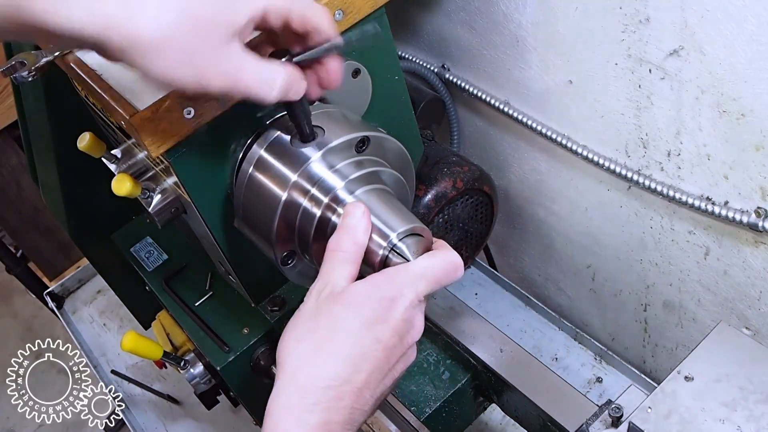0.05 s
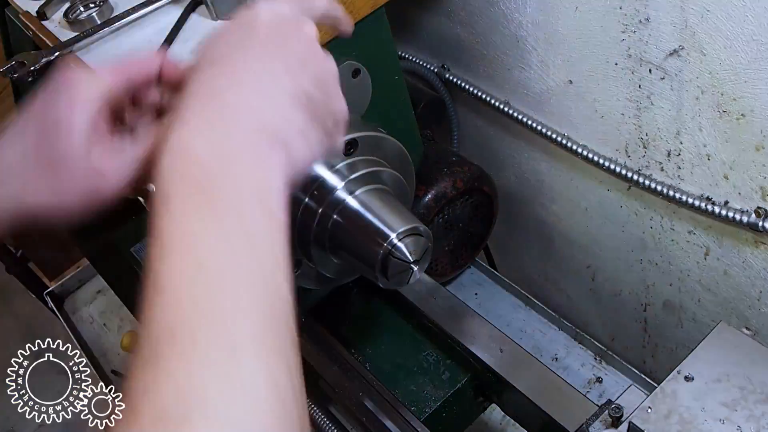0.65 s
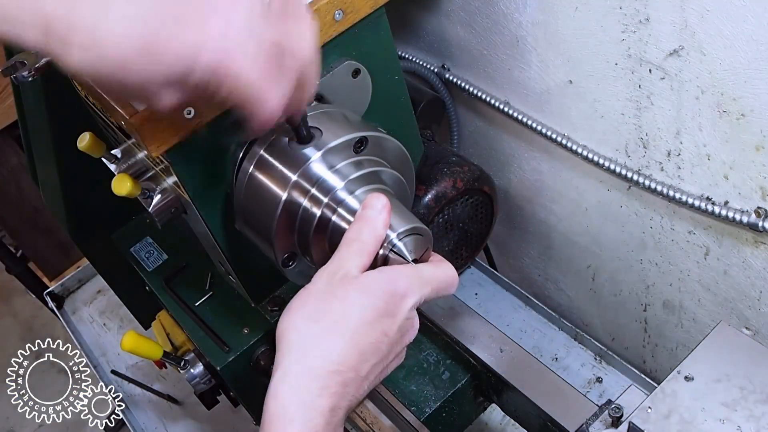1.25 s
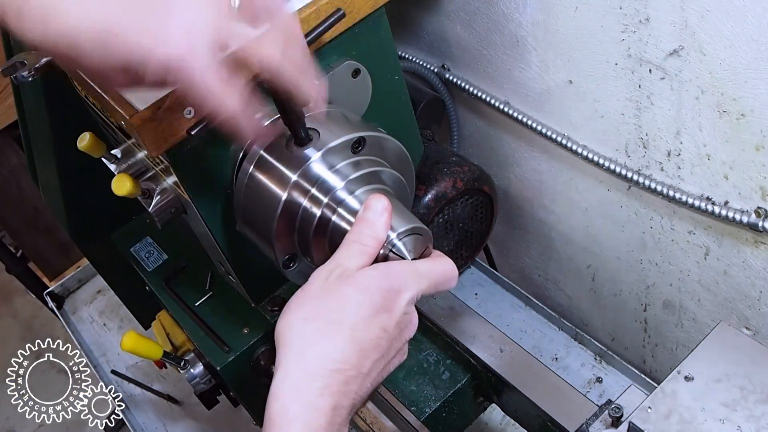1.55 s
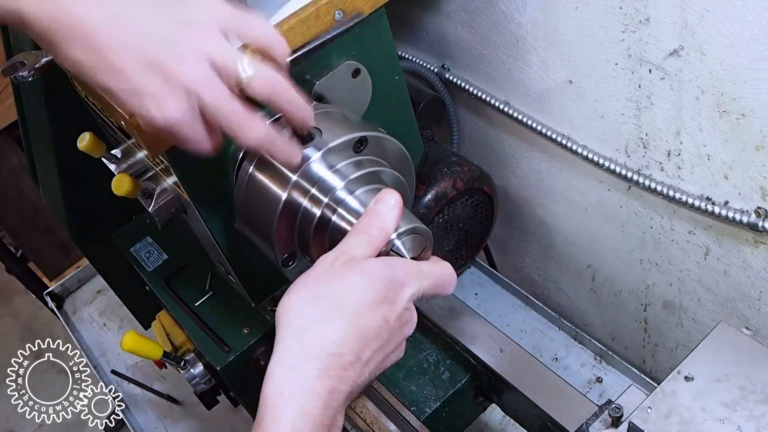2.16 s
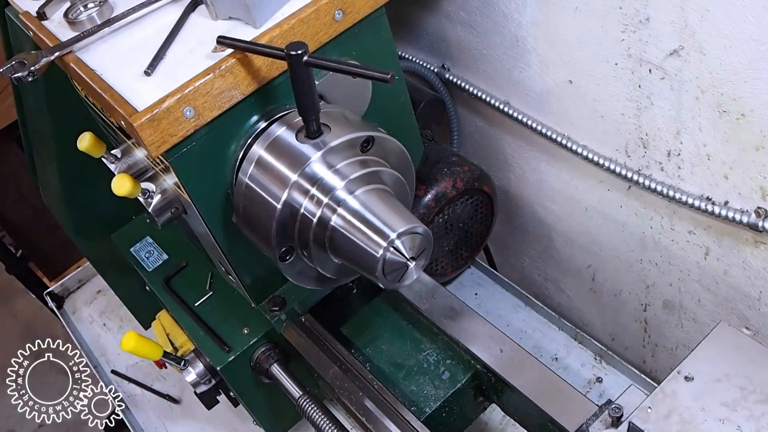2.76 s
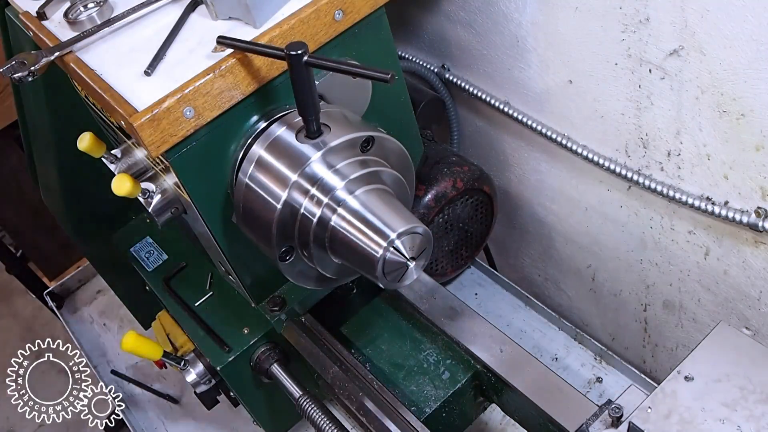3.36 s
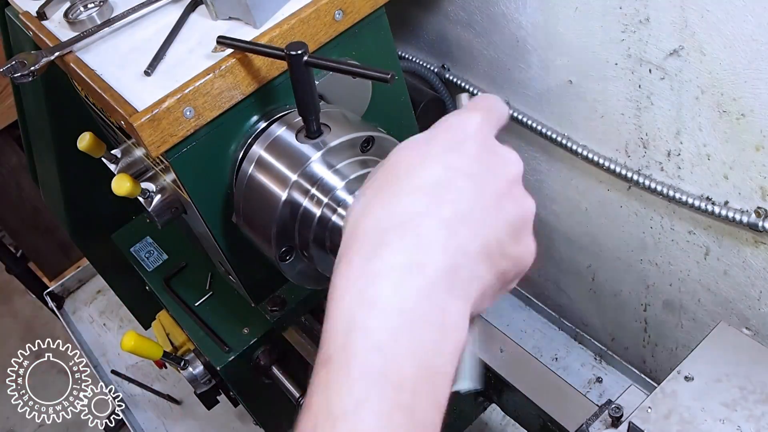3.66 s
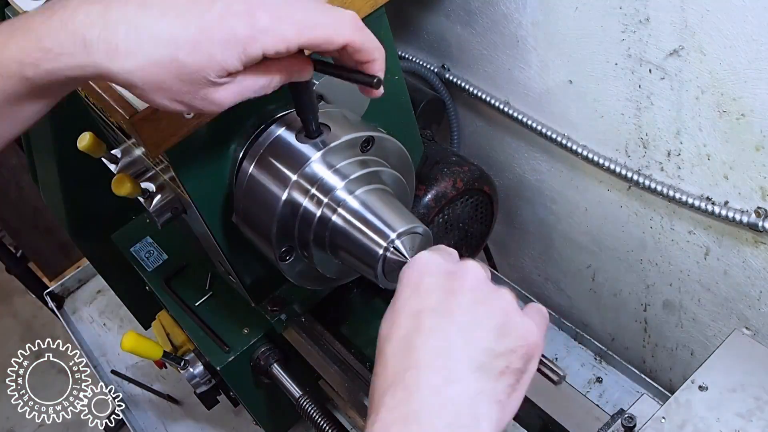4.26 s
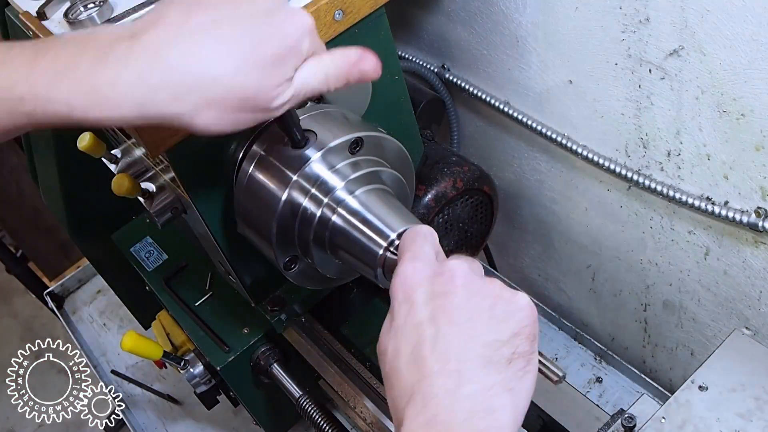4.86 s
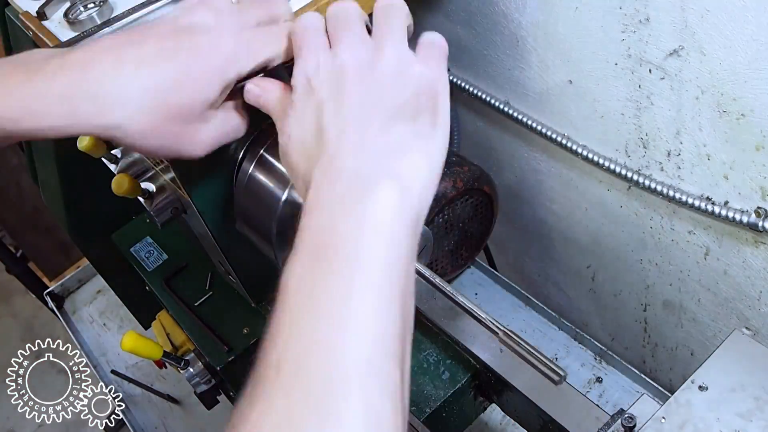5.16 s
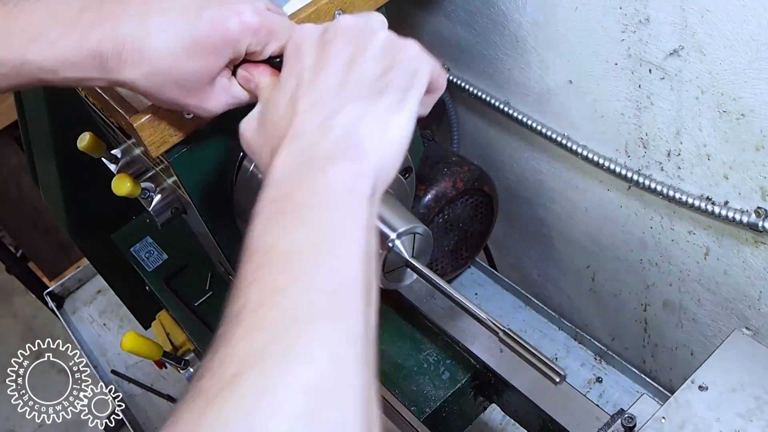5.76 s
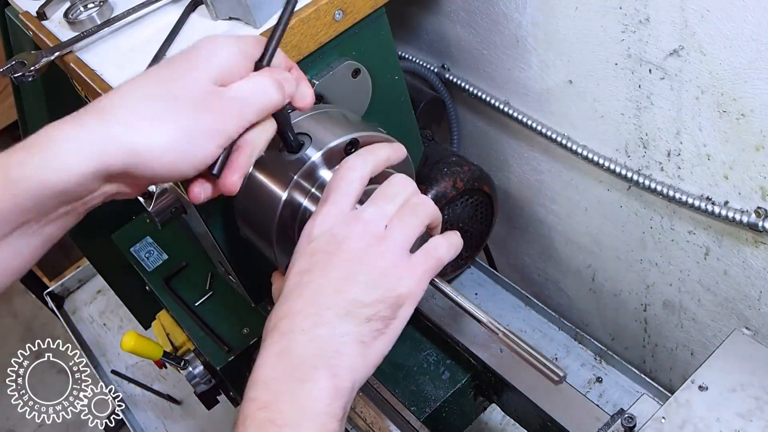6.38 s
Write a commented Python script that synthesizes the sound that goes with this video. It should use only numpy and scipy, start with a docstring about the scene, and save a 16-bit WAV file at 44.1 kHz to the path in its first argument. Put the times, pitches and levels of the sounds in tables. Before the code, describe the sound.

Over the even hiss and hum of a workshop, a key scrapes and ticks quickly round its socket in a lathe chuck, each contact giving a short, bright steel ring. The spinning stops and a few light rubs on metal follow. A rod clacks sharply into place about halfway through, and then the key turns again in brief scrapes and small knocks, with almost no echo.

```python
"""A T-handled key spins in a lathe's collet chuck, scraping, ticking and knocking in its socket.
Each contact sets its steel handle and shank ringing, quick, high and short. Hands scuff the metal,
a steel rod clacks home in the collet, and the key is tightened again in short nudges.
The workshop hums and hisses throughout, and a faint far tone glides upward twice."""
import sys
import numpy as np
from scipy import signal
from scipy.fft import rfft, irfft
from scipy.io import wavfile
from scipy.ndimage import uniform_filter1d

SR = 44100
rng = np.random.default_rng(int(sys.argv[2]) if len(sys.argv) > 2 else 0)


def generate_wav(signal):
    """Clip the signal to [-1, 1] and save it as 16-bit WAV at the path in sys.argv[1]."""
    frames = np.transpose(np.atleast_2d(signal))
    scaled = np.clip(frames, -1, 1) * 32767
    pcm = np.round(scaled).astype(np.int16)
    wavfile.write(sys.argv[1], SR, pcm)


N = 291942

# The ring of the key's handle and of its shank: pitch_hz, level_db, t60_s
HANDLE_MODES = [(2295, 0, .024), (2383, 37, 0.022), (2500, -14, .028), (2690, -6, .016)]
SHANK_MODES = [(2920, 5.5, 0.024), (3208, 12.5, 0.033), (3340, -34, .025), (3500, -19, 0.018),
               (6800, -28, .04), (7800, -17, 0.044), (10300, -14, 0.059)]
# Tone colours of steel contact, sharp grit and softer hiss: frequency_hz, level_db
GRIT_EQ = [(100, -47), (700, -54), (1500, -3), (3000, -20), (5000, 35.5), (8000, 37), (11000, 29),
           (16000, 31)]
HISS_EQ = [(300, -29), (2000, -5), (4000, -3.5), (7000, 9), (10000, 10), (16000, 3)]


def gain(db):
    """Decibels to gain."""
    return 10 ** (np.asarray(db) / 20)


def unit_rms(x):
    """Scales to rms 1."""
    return x / np.sqrt(np.mean(x ** 2) + 1e-20)


def eq_db(curve, hz):
    """Reads an EQ curve on a log-frequency axis."""
    points_hz, level_db = np.transpose(curve)
    return np.interp(np.log(hz + 1), np.log(points_hz + 1), level_db)


def add(mix, start_s, sound):
    """Mixes a sound in at its start time."""
    part = mix[max(round(start_s * SR), 0):][:len(sound)]
    part += sound[:len(part)]


def drift(rate_hz):
    """A random wobble of rms 1, up to about the given rate."""
    knots = rng.standard_normal(2048)
    return unit_rms(np.interp(np.arange(N) / SR * 2 * rate_hz, np.arange(len(knots)), knots))


def ring(modes, detune=1, rise_s=0.00004, size=4096):
    """Struck steel: dying modes, alternating in polarity so that little sounds outside them."""
    t = np.arange(size) / SR
    motion = sum((-1) ** k * gain(db - 60 * t / t60_s) * np.cos(2 * np.pi * hz * detune * t)
                 for k, (hz, db, t60_s) in enumerate(modes))
    lowest_hz = min(hz for hz, _, _ in modes)
    low_cut = signal.butter(2, lowest_hz * 0.8, "high", fs=SR, output="sos")
    return signal.sosfilt(low_cut, motion * (1 - np.exp(-t / rise_s)))


def click(curve, size=1024):
    """A minimum-phase click with the tone colour of an EQ curve."""
    hz = abs(np.fft.fftfreq(size, 1 / SR))
    log_gain = np.log(gain(eq_db(curve, hz)))
    spectrum = np.exp(np.conj(signal.hilbert(log_gain)))
    return np.fft.ifft(spectrum).real


def excite(force, body, length_s):
    """A force sounds a body, with the energy of rms 1 held for length_s."""
    sound = signal.fftconvolve(force, body)
    return sound * np.sqrt(length_s * SR / (np.sum(sound ** 2) + 1e-20))


def blow(chatter, decay_s, contact_s=0.00061, size=4096):
    """The force of one hard, rough hit, followed by the dying chatter of loose steel."""
    t = np.arange(size) / SR
    return rng.choice([-1, 1], size) * (np.exp(-t / contact_s) + chatter * np.exp(-t / decay_s))


def slide(length_s, impacts_per_s, spread_db, release_s, bite=0.83, size=6144):
    """The force of sliding contact: a shower of tiny impacts that bites, swells and dies away."""
    t = np.arange(size) / SR
    impacts = (rng.random(size) < impacts_per_s / SR) * rng.choice([-1, 1], size)
    strengths = gain(spread_db * np.minimum(rng.exponential(1, size), 3))
    swell = np.minimum(bite + t / length_s, 1)
    release = np.exp(-np.maximum(t - length_s, 0) / release_s)
    return impacts * strengths * swell * release


def workshop_hum(waver=0.00125, flutter=0.13):
    """Steady machine tones that waver a little in pitch and level."""
    # The tones of the hum: pitch_hz, level_db
    tones = [(457.5, -70), (654.4, -62), (960, -59), (1308.8, -65.5), (1921, -62), (1963.3, -55),
             (1968, -75), (2620, -60.5), (3272, -59), (3922, -62.5), (4582, -65), (4890, -59), (5293, -74),
             (10563, -64.5)]
    out = np.zeros(N)
    for pitch_hz, level_db in tones:
        cycles = np.cumsum(pitch_hz * (1 + waver * drift(6.34))) / SR
        tremolo = 1 + flutter * drift(38)
        out += gain(level_db) * unit_rms(tremolo * np.sin(2 * np.pi * cycles))
    return out


def workshop_air(level_db=-43.5, ripple_db=0.9, swell_db=0.25):
    """An even bed of noise, coloured by broad resonances and the fine ripple of the room."""
    # The overall colour of the room tone: frequency_hz, level_db
    air_eq = [(20, -34), (70, -20), (150, -18.5), (250, -13), (400, -7.5), (600, -0.5), (1150, -8.5),
              (1750, -6.5), (2600, 4), (4000, 3.5), (5500, 2), (9500, 2.5), (13000, -2.5), (15700, -6)]
    # Its resonances: centre_hz, width_hz, boost_db
    resonances = [(321, 38, 6.5), (1327, 730, 7.24), (1906, 100, 7.8), (3023, 95, 4.5), (3440, 91, 2.4),
                  (3860, 110, 7.2), (5450, 100, 2.6), (12600, 220, 5.7)]
    hz = np.fft.rfftfreq(N, 1 / SR)
    peaks_db = sum(boost_db / (1 + (2 * (hz - centre_hz) / width_hz) ** 2)
                   for centre_hz, width_hz, boost_db in resonances)
    ripple = unit_rms(uniform_filter1d(rng.standard_normal(len(hz)), size=500))
    ripple *= np.minimum(hz / 3000, 1)  # smoother toward the bass
    colour = gain(eq_db(air_eq, hz) + peaks_db + ripple_db * ripple)
    noise = irfft(rfft(rng.standard_normal(N)) * colour, N)
    return gain(level_db + swell_db * drift(9.8)) * unit_rms(noise)


def key_ticks(ticks_per_s=45, grit_db=-5):
    """Under the fingers, the loose key keeps ticking faintly in its socket."""
    # Stretches with fingers on the key: start_s, end_s, level_db
    handling = [(0, 2.55, -46.5), (4.0, 7.7, -54.5)]
    t = np.arange(N) / SR
    level = sum(gain(level_db) * (t > start_s) * (t < end_s) for start_s, end_s, level_db in handling)
    ticks = (rng.random(N) < ticks_per_s / SR) * rng.standard_normal(N)
    body = unit_rms(ring(HANDLE_MODES)) + 0.5 * unit_rms(ring(SHANK_MODES))
    grit = signal.fftconvolve(blow(chatter=0.1, decay_s=0.004), click(GRIT_EQ))
    ringing = unit_rms(signal.oaconvolve(ticks, body)[:N])
    grinding = unit_rms(signal.oaconvolve(ticks, grit)[:N])
    return level * (ringing + gain(grit_db) * grinding)


def key_strokes(scrape_s=0.031, rebound_turn=0.58, rebound_db=-9.5):
    """Cues the key's strokes as (start_s, length_s, level_db): nudges, and a scrape per turn of a spin."""
    # Single short turns by hand: start_s, length_s, level_db
    nudges = [(2.365, 0.0057, -41), (2.403, .024, -39.5), (2.437, .013, -37), (2.507, .016, -41),
              (2.568, 0.025, -43.5), (3.527, 0.049, -36.5), (3.644, .013, -37.5), (4.021, 0.018, -37.5),
              (4.198, 0.0087, -39.5), (4.372, 0.025, -45), (4.405, 0.011, -37), (4.451, 0.012, -43),
              (4.766, 0.01, -42), (4.96, 0.068, -44), (5.035, 0.015, -36), (5.382, 0.031, -41),
              (5.473, .03, -43), (5.686, 0.037, -42.5), (5.905, 0.051, -43), (6.016, 0.047, -42.5),
              (6.105, .031, -42.5), (6.538, 0.019, -41), (6.572, .012, -39)]
    # Spins from a flick of the fingers: start_s, end_s, turns_per_s
    spins = [(0.039, 0.215, 13.6), (0.296, 0.76, 15.9), (0.839, 1.155, 16.6), (1.227, 2.285, 14.5)]
    # How hard the spinning key bears on its socket: time_s, level_db
    bearing = [(0.04, -36.5), (0.19, -36.5), (0.3, -45), (0.49, -36), (0.65, -36), (0.74, -44),
               (0.89, -40.5), (0.96, -35), (1.3, -38.5), (1.6, -35), (1.79, -43.5), (2.0, -33),
               (2.27, -36.5)]
    strokes = list(nudges)
    for start_s, end_s, turns_per_s in spins:
        for turn_s in np.arange(start_s, end_s, 1 / turns_per_s):
            level_db = np.interp(turn_s, *np.transpose(bearing))
            strokes.append((turn_s, scrape_s, level_db))
            rebound_s = turn_s + rebound_turn / turns_per_s  # the key rocks back against the far wall
            if rebound_s < end_s:
                strokes.append((rebound_s, scrape_s / 2, level_db + rebound_db))
    return strokes


def key_scrapes(shank_db=-3.5, grit_db=-8, grip_detune=0.013):
    """The turning key scrapes round its socket; handle and shank ring, detuned a little by the fingers."""
    out, grit = np.zeros(N), click(GRIT_EQ)
    for start_s, length_s, level_db in key_strokes():
        force = slide(length_s * 0.91, impacts_per_s=1100, spread_db=4, release_s=0.0018)
        detune = 1 + grip_detune * rng.standard_normal()
        handle, shank = ring(HANDLE_MODES, detune), ring(SHANK_MODES, np.sqrt(detune))
        for body, trim_db in (handle, 0), (shank, shank_db), (grit, grit_db):
            add(out, start_s, gain(level_db + trim_db) * excite(force, body, length_s))
    return out


def key_knocks(handle_trim_db=1, crack_trim_db=3, light_db=-36, span_db=9, length_s=0.012):
    """The key hits the socket wall: a crack, and a ring that depends on where it is struck."""
    # Each knock and the balance of its layers: start_s, handle_db, shank_db, crack_db
    knocks = [(0.3634, -32, -32.5, -50), (0.6607, -29.5, -28, -45), (0.774, -36, -49, -30),
              (0.79, -31.5, -32, -27.5), (0.9032, -31, -35, -24.5), (0.9659, -35, -42, -24),
              (1.032, -36, -43, -27), (1.097, -38, -52, -23.5), (1.1691, -35, -27.5, -23.5),
              (1.2948, -40, -39, -43.5), (1.8023, -32, -40, -52), (2.119, -32.5, -39, -39.5),
              (4.1125, -40, -40, -51), (5.0973, -39.5, -40, -46), (5.211, -44.5, -44.5, -57),
              (5.549, -29.5, -31.5, -35.5), (5.59, -42, -39, -40), (5.6027, -36, -34, -47),
              (5.617, -30.5, -31, -49), (5.6283, -25, -26, -36.5), (6.1577, -38.5, -28, -36.5),
              (6.246, -44, -41, -45), (6.2645, -33, -35, -38.5), (6.298, -31.5, -32.5, -38.5),
              (6.3166, -32.5, -32.5, -42), (6.4947, -35, -46, -56)]
    # The colour of a hard hit: frequency_hz, level_db
    crack_eq = [(60, -44), (400, -36.5), (1000, -12), (2000, -4), (2900, 4), (3700, 12.5), (4500, 7.5),
                (5500, 2), (6900, 3.5), (7700, 1), (10000, 2), (14500, -9), (16000, 5)]
    out, handle, shank = np.zeros(N), ring(HANDLE_MODES), ring(SHANK_MODES)
    crack, tick = unit_rms(click(crack_eq)), unit_rms(click(HISS_EQ))
    for start_s, handle_db, shank_db, crack_db in knocks:
        force = blow(chatter=0.42, decay_s=0.0058)
        hit_s = start_s + 0.0013  # each knock sounds a moment after its listed time
        hardness = np.clip((crack_db - light_db) / span_db, 0.2, 1)
        attack = hardness * crack + (1 - hardness) * tick  # light blows tick, hard ones crack
        add(out, hit_s, gain(handle_db + handle_trim_db) * excite(force, handle, length_s))
        add(out, hit_s, gain(shank_db) * excite(force, shank, length_s))
        add(out, hit_s, gain(crack_db + crack_trim_db) * excite(force, attack, length_s))
    return out


def far_glides(fade_share=0.29):
    """A faint far tone fades in, rises in pitch and fades out."""
    # The rising tones: start_s, length_s, from_hz, to_hz, level_db
    glides = [(2.42, 0.277, 968, 1047, -60.5), (3.70, .21, 958, 1070, -56.5)]
    out = np.zeros(N)
    for start_s, length_s, from_hz, to_hz, level_db in glides:
        pitch_hz = np.linspace(from_hz, to_hz, round(length_s * SR))
        tone = unit_rms(np.sin(2 * np.pi * np.cumsum(pitch_hz) / SR))
        add(out, start_s, gain(level_db) * tone * signal.windows.tukey(len(tone), fade_share))
    return out


def steel_scuffs():
    """Hands and rod rub the steel, too damped to ring: a bright hiss over a dull body."""
    # Each rub and the balance of its layers: start_s, length_s, hiss_db, dull_db
    scuffs = [(2.671, 0.0075, -33.5, -50), (2.697, .008, -35.5, -56), (2.777, 0.011, -49, -35.5),
              (2.854, .028, -43.5, -39), (2.944, 0.0075, -40, -29.5), (3.211, 0.031, -39, -43.5),
              (3.351, 0.05, -44, -41.5), (3.434, .026, -44, -45.5), (3.485, .045, -39.5, -57),
              (4.069, 0.01, -37, -46)]
    # The colour of the dull body: frequency_hz, level_db
    dull_eq = [(60, -37), (300, -15.5), (900, 0), (1700, -2), (3500, 3), (5500, 2.5), (12000, -8)]
    out, hiss, dull = np.zeros(N), click(HISS_EQ), click(dull_eq)
    for start_s, length_s, hiss_db, dull_db in scuffs:
        force = slide(length_s * 0.7, impacts_per_s=8100, spread_db=0, release_s=0.0088)
        add(out, start_s, gain(hiss_db) * excite(force, hiss, length_s))
        add(out, start_s, gain(dull_db) * excite(force, dull, length_s))
    return out


def rod_seating(ring_db=-1, hiss_db=-9, thud_db=-16, length_s=0.0046):
    """The rod bounces against the collet and thuds into the headstock; later it slips in, ticking."""
    # The rod's bounces, and its stick-slip ticks in the collet: start_s, level_db
    clacks = [(3.5477, -15.5), (3.5506, -20), (3.5535, -17.5)]
    slips = [(4.471, -40), (4.479, -38), (4.4874, -33)]
    # The ring of a bounce and of a slip: pitch_hz, level_db, t60_s
    clack_modes = [(2340, -4, 0.042), (3160, -4, 0.032), (3360, 14.5, 0.01), (3880, 6.5, 0.0081),
                   (4380, 9, 0.0096), (5360, 7, 0.01), (5770, 0, 0.016), (6730, -1.5, 0.013)]
    slip_modes = [(3380, -2.3, 0.01), (5150, 1, 0.0094), (5600, 1, 0.012)]
    # The colour of the headstock's thud: frequency_hz, level_db
    thud_eq = [(50, -21), (200, -17), (450, -4), (900, 0), (2200, 3.5), (6000, -19)]
    out = np.zeros(N)
    for start_s, level_db in clacks:
        force = blow(chatter=0.2, decay_s=0.005)
        crunch = blow(chatter=0.75, decay_s=0.011)  # the rod's edge grinds along the jaws
        add(out, start_s, gain(level_db + ring_db) * excite(force, ring(clack_modes), length_s))
        add(out, start_s, gain(level_db + thud_db) * excite(crunch, click(thud_eq), length_s))
        add(out, start_s, gain(level_db + hiss_db) * excite(crunch, click(HISS_EQ), length_s))
    for start_s, level_db in slips:
        force = blow(chatter=0.05, decay_s=0.0016)
        add(out, start_s, gain(level_db) * excite(force, ring(slip_modes), length_s))
    return out


def room(x, t60_s, predelay_s=0.002, size=6144):
    """Short diffuse reverb from a dying noise tail of energy 1."""
    t = np.arange(size) / SR
    tail = rng.standard_normal(size) * gain(-60 * t / t60_s) * (t > predelay_s)
    return signal.oaconvolve(x, tail / np.linalg.norm(tail))[:N]


def scene(room_db=-11, spread_db=-2, left_db=-2.27, right_db=-2.1):
    """Key, rod and hands at the chuck in the humming shop; mainly treble and bass spread from centre."""
    # Stereo width, as an EQ on the side channel: frequency_hz, level_db
    width_eq = [(30, -11), (125, -4), (250, -10), (600, -17), (1300, -13.5), (2500, -35), (4000, -34),
                (6000, -14), (8500, -11.5), (14000, -7)]
    work = key_scrapes() + key_ticks() + key_knocks() + rod_seating() + steel_scuffs()
    shop = work + gain(room_db) * room(work, t60_s=0.06) + workshop_hum() + far_glides()
    mid = shop + workshop_air()
    diffuse = gain(spread_db) * room(shop, t60_s=0.017) + workshop_air()
    width = gain(eq_db(width_eq, np.fft.rfftfreq(N, 1 / SR)))
    side = irfft(rfft(diffuse) * width, N)
    return np.array([gain(left_db) * (mid + side), gain(right_db) * (mid - side)])


def record(dry, cutoff_hz=15900):
    """A steep low-pass takes off the very top of the treble."""
    low_pass = signal.firwin(401, cutoff_hz, window=("kaiser", 9), fs=SR)
    return signal.oaconvolve(dry, low_pass[None], "same")


dry = scene()
out = record(dry)
generate_wav(out)
```